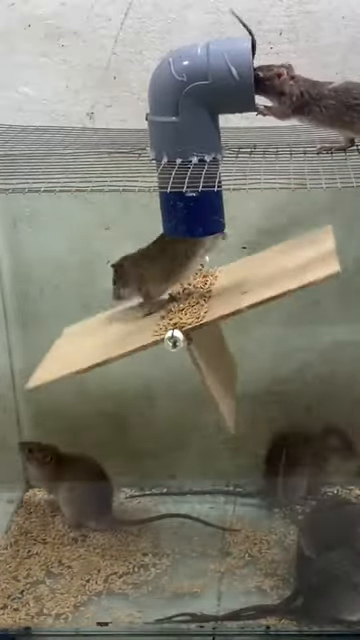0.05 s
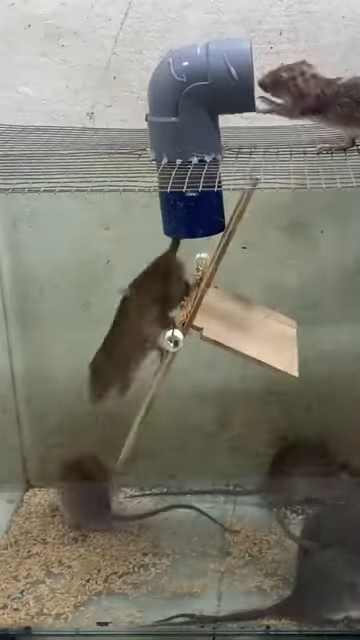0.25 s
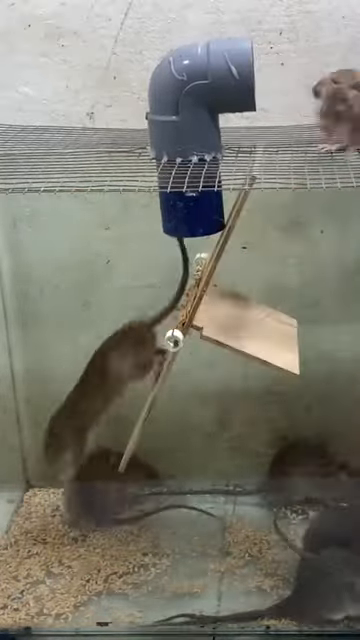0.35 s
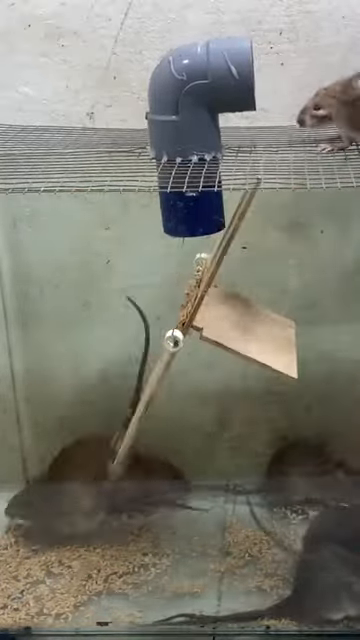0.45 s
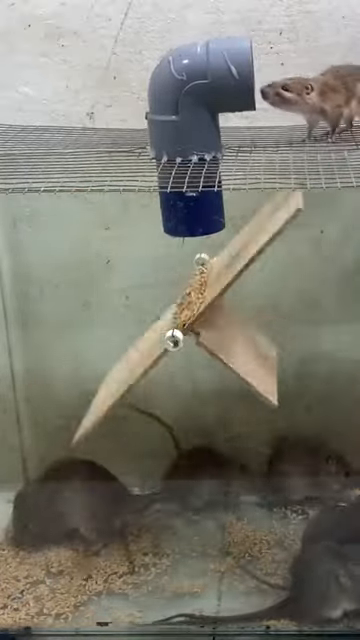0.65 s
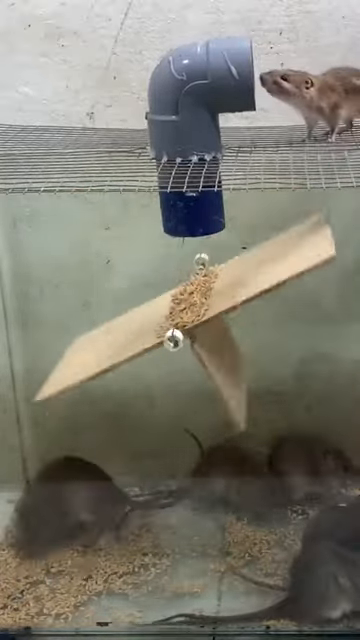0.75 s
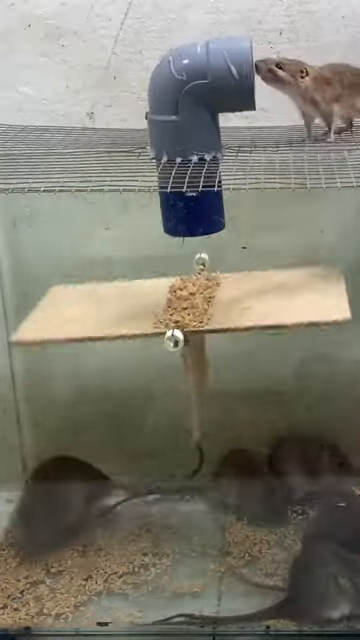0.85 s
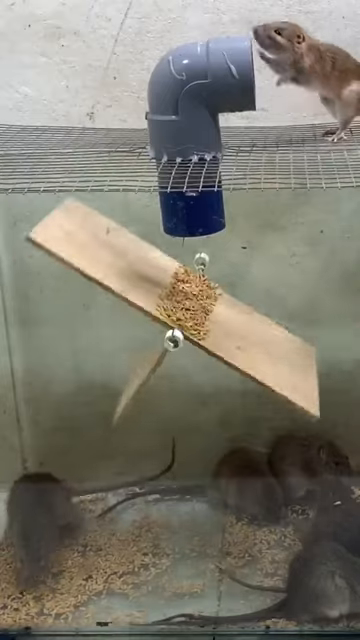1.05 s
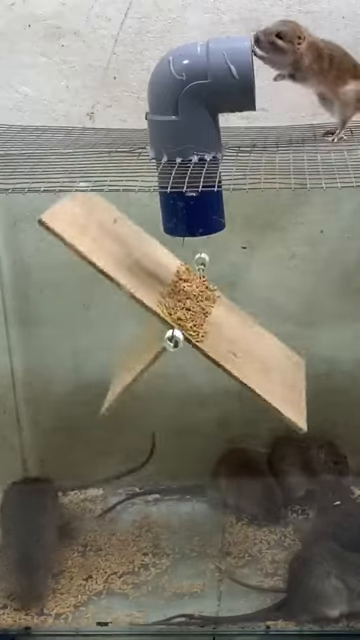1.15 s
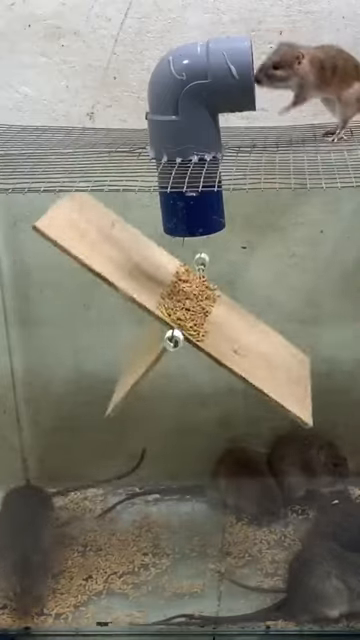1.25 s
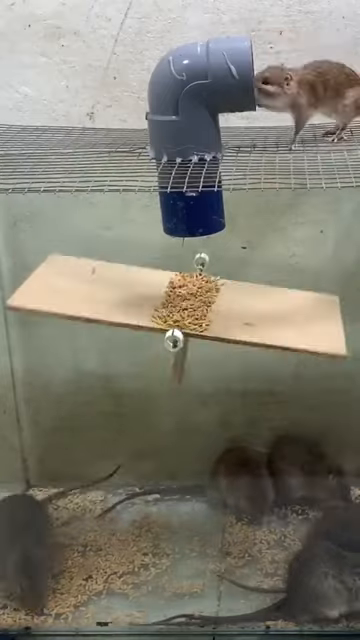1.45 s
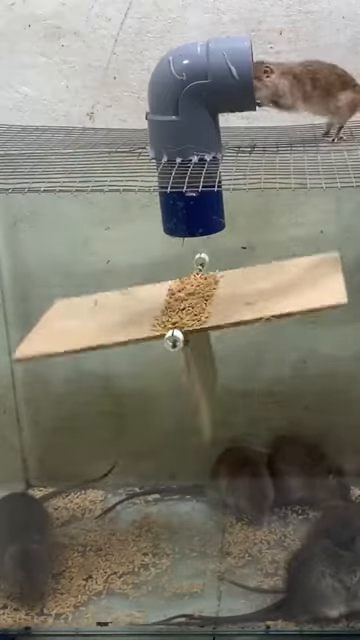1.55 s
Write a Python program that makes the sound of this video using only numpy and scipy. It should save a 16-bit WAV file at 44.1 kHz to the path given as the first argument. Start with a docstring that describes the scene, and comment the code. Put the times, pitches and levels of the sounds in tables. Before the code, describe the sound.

A wooden plank clacks and a rat drops into a glass tank with a hollow boom.

```python
"""Over quiet room hum, a rat drops off a tipping wooden plank into a glass tank, heard close.
The plank clacks against its stop, and the blows set the panes and the air in the tank booming.
Loose feed grain sprays, then rustles under scrambling feet. The plank swings back with a soft bump.
As the boom fades, claws scratch in short strokes, and a few claws and grains tick on the glass."""
import sys
import numpy as np
from scipy import signal
from scipy.fft import rfft, irfft
from scipy.io import wavfile

SR = 44100
rng = np.random.default_rng(int(sys.argv[2]) if len(sys.argv) > 2 else 0)


def int16_out(signal):
    """Quantize to a 16-bit WAV file."""
    q = np.round(np.clip(np.atleast_2d(signal).T, -1, 1) * 32767)
    wavfile.write(sys.argv[1], SR, q.astype(np.int16))


N = 70560
TIME_S = np.arange(N) / SR
OPPOSITE_LR = np.array([[1], [-1]])


def amp(db):
    return 10 ** (np.asarray(db) / 20)


def unit_rms(x):
    return x / np.sqrt(np.mean(x ** 2) + 1e-20)


def unit_energy(x):
    return x / np.sqrt(np.mean(np.sum(x ** 2, -1)) + 1e-20)


def at_hz(curve, hz):
    knots_hz, values = np.transpose(curve)
    return np.interp(np.log(hz + 1), np.log(knots_hz + 1), values)


def add(mix, start_s, sound):
    part = mix[..., max(round(start_s * SR), 0):][..., :sound.shape[-1]]
    part += sound[..., :part.shape[-1]]


def convolve(x, response):
    return signal.fftconvolve(np.atleast_2d(x), np.atleast_2d(response), axes=1)[:, :N]


def min_phase(db_at_hz, size=4096):
    """Causal impulse response with the given spectral shape."""
    hz = abs(np.fft.fftfreq(size, 1 / SR))
    log_gain = np.log(amp(np.maximum(db_at_hz(hz), -100)))
    spectrum = np.exp(np.conj(signal.hilbert(log_gain)))
    return unit_energy(np.fft.ifft(spectrum).real)


# Left-right likeness: f/Hz, correlation
CORRELATION = [(50, 0.86), (170, 0.93), (300, 0.63), (600, 0.29), (2000, 0.15), (14000, 0.017)]


def stereo_angle_rad(hz):
    return np.arccos(np.clip(at_hz(CORRELATION, hz), -1, 1)) / 2


def correlate_lr(x):
    """Makes two independent channels alike in the bass."""
    spectra = rfft(x)
    angle = stereo_angle_rad(np.fft.rfftfreq(x.shape[1], 1 / SR))
    mid, side = spectra[0] * np.cos(angle), spectra[1] * np.sin(angle)
    return irfft(np.array([mid + side, mid - side]), x.shape[1])


# Room noise spectrum: f/Hz, relative level/dB
ROOM_SPECTRUM = [(15, -42), (36, -9.5), (48, 6), (62, -1), (95, 0), (160, -3), (240, -12.5), (320, -8),
                 (700, -22), (1200, -26), (2300, -28), (4500, -36), (10000, -46), (15000, -47)]


def room(noise_db=-49.5, hum_hz=48.7, hum_db=-48):
    """Quiet room noise with a low hum."""
    white = correlate_lr(rng.standard_normal((2, N)))
    gain = amp(at_hz(ROOM_SPECTRUM, np.fft.rfftfreq(N, 1 / SR)))
    noise = unit_rms(irfft(rfft(white) * gain, N))
    return amp(noise_db) * noise + amp(hum_db) * np.sin(2 * np.pi * hum_hz * TIME_S)


# Tank reverberation: f/Hz, T60/s
TANK_DECAY = [(150, 0.78), (600, 0.5), (2000, 0.41), (6000, 0.11), (14000, 0.21)]


def tank_reverb(x, early_tau_s=0.009, early_db=-1, rise_s=0.0045):
    """Dense early bounces between the panes, and a tail that dies sooner in the treble."""
    hz, frame_s, spectra = signal.stft(rng.standard_normal((2, SR)), SR, nperseg=256)
    decay = amp(-60 * frame_s / at_hz(TANK_DECAY, hz)[:, None])
    tail = signal.istft(spectra * decay, SR, nperseg=256)[1][:, :SR]
    t = TIME_S[:SR]
    early = rng.standard_normal((2, SR)) * np.exp(-t / early_tau_s)
    response = (unit_energy(tail) + amp(early_db) * unit_energy(early)) * np.minimum(t / rise_s, 1)
    return convolve(x, unit_energy(correlate_lr(response)))


def crackle(spectrum, rate_per_s, spread_db):
    """Tiny impacts of uneven size at random moments."""
    clicks = (rng.random(N) < rate_per_s / SR) * rng.choice([-1, 1], N)
    sizes = amp(spread_db * np.minimum(rng.exponential(1, N), 4))
    response = min_phase(lambda hz: at_hz(spectrum, hz))
    return unit_rms(convolve(clicks * sizes, response)[0])


def contact(centre_hz, width_oct, tau_s):
    """Brief rough contact: a band of noise with the energy of 20 ms at 0 dB."""
    def band_db(hz):
        offset = np.log2((hz + 1) / centre_hz) / width_oct
        return -14 * np.log10(1 + offset ** 2) - 20 * np.log10(1 + (hz / (5 * centre_hz)) ** 2)

    t = TIME_S[:SR // 8]
    spectra = rfft(rng.standard_normal((2, len(t))) * np.exp(-t / tau_s))
    whitened = irfft(spectra / abs(spectra), len(t))
    burst = correlate_lr(whitened * np.exp(-t / (2 * tau_s)))
    return unit_energy(convolve(burst, min_phase(band_db))) * np.sqrt(0.02 * SR)


# Claw strokes: t/s, length/s, relative level/dB
CLAW_STROKES = [(.70, 0.021, -44.5), (0.738, 0.026, -50), (0.847, .02, -48.5), (1.253, 0.082, -54.5),
                (1.369, 0.11, -57), (1.489, 0.021, -49), (1.542, 0.024, -51)]
# Claw slip spectrum: f/Hz, relative level/dB
SLIP_SPECTRUM = [(1000, -16.5), (2100, -2.5), (2500, -4.5), (3300, -9.5), (4500, -18), (7500, -21),
                 (15000, -24)]


def claw_scratches(dry_db=-11.5, wet_db=-3):
    """Each stroke of a claw on wood or glass is a short swell of slips."""
    pressure = np.zeros(N)
    for start_s, length_s, db in CLAW_STROKES:
        progress = np.arange(0, 1, 1 / (length_s * SR))
        add(pressure, start_s, amp(db) * np.sqrt(np.sin(np.pi * progress)))
    slips = pressure * crackle(SLIP_SPECTRUM, rate_per_s=700, spread_db=3)
    return amp(dry_db) * slips + amp(wet_db) * tank_reverb(slips)


# Ticks on glass: t/s, relative level/dB, f/Hz, width/oct, extra direct gain/dB
GLASS_TICKS = [(0.2052, -41, 2880, 0.22, -14), (0.504, -36, 7300, 0.13, -5), (.512, -49, 7040, 0.097, -15),
               (0.7698, -42, 2310, .6, -12), (0.8846, -43.5, 2310, 0.82, -7), (0.897, -49, 5360, 0.35, -2),
               (.953, -48, 4630, 2.12, -1.5), (1.1044, -65, 2500, 0.3, 7), (1.1726, -45, 3610, 0.72, -1),
               (1.5041, -53, 2600, 0.33, 3.5), (1.566, -49, 3960, 1.8, -3)]


def glass_ticks(dry_db=-11.5, wet_db=-6):
    """Claws and single grains strike the glass: a centred snap, then reverberation."""
    hits, snaps = np.zeros((2, 2, N))
    for start_s, db, hz, width_oct, direct_db in GLASS_TICKS:
        tick = amp(db) * contact(hz, width_oct, tau_s=0.00065)
        add(hits, start_s, tick)
        add(snaps, start_s, amp(direct_db) * tick[0])
    return amp(dry_db) * snaps + amp(wet_db) * tank_reverb(hits)


# Grain scatter envelope: t/s, relative level/dB
GRAIN_ENVELOPE = [(0.0, -67.5), (0.178, -67.5), (0.262, -39), (0.328, -46.5), (0.454, -49.5), (0.502, -46),
                  (0.614, -54), (0.876, -60.5), (0.894, -59.5), (0.94, -64.5), (0.958, -53), (1.028, -65.5),
                  (1.166, -69.5), (1.172, -61.5), (1.27, -68.5), (1.304, -60.5), (1.46, -68.5), (1.6, -60)]
# Grain impact spectrum: f/Hz, relative level/dB
GRAIN_SPECTRUM = [(700, -16), (1400, -3.5), (2500, 0), (5000, -3.5), (7500, -7), (10500, -8.5),
                  (14000, -18.5), (15200, -30)]


def feed_grain(dry_db=-1.5, wet_db=2):
    """Feed sprays and is kicked about on both sides."""
    impacts = np.array([crackle(GRAIN_SPECTRUM, rate_per_s=1800, spread_db=2.5) for side in "LR"])
    rustle = impacts * amp(np.interp(TIME_S, *np.transpose(GRAIN_ENVELOPE)))
    return amp(dry_db) * rustle + amp(wet_db) * tank_reverb(rustle)


# Plank on its stop: t/s, level/dB, f/Hz, rise/s
PLANK_TOCKS = [(.235, -26, 1350, .003), (.502, -26, 885, .008)]


def plank_tocks(wet_db=-8):
    """At each hit one hollow mode of the plank swells and dies."""
    tocks, t = np.zeros((2, N)), TIME_S[:SR // 4]
    for start_s, db, hz, rise_s in PLANK_TOCKS:
        envelope = t / rise_s * np.exp(1 - t / rise_s)
        add(tocks, start_s, amp(db) * envelope * np.sin(2 * np.pi * hz * t))
    return tocks + amp(wet_db) * tank_reverb(tocks)


# Plank and landing impacts: t/s, relative level/dB, f/Hz, width/oct, decay/s
IMPACTS = [(.152, -39, 328, 1.7, 0.015), (0.2035, -28, 1200, 0.45, 0.022), (.236, -25, 1250, 0.68, 0.0028),
           (.2455, -18.5, 634, 0.45, 0.0046), (.268, -21, 463, 0.67, 0.0044),
           (.284, -40.5, 1480, 1.2, 0.023), (.303, -32, 627, 0.15, 0.018), (.378, -26.5, 576, 0.78, 0.027),
           (.464, -31.5, 1860, 0.7, 0.012), (.504, -27.5, 924, 0.16, 0.0066),
           (.507, -24.5, 534, 0.68, 0.013), (.528, -28, 1050, 1.4, 0.015), (.552, -28, 560, 0.39, 0.0034),
           (.664, -34.5, 1500, 0.55, 0.004), (.775, -38.5, 434, 2.4, 0.022),
           (.855, -56, 1016, 0.63, 0.0037), (1.315, -42.5, 440, 1.2, 0.014), (1.415, -47, 936, 0.27, 0.023),
           (1.564, -44.5, 1020, 0.65, 0.016)]
# Upper tank modes: f/Hz, relative level/dB, T60/s
UPPER_MODES = [(428, -2, 0.86), (478.7, -11.5, 0.35), (579, 0, 0.62), (631.5, 0.5, 0.44), (688.7, 1, 0.51),
               (717, 0.5, 0.12), (853, -36, 0.16), (1040, -2, 0.57), (1123, 3.5, 0.2), (1280, -28, 0.15),
               (1410, -1, 0.52), (2145, -1, 0.59), (2408, 4.5, 0.72)]


def clacks(dry_db=-15.5, wet_db=-14, ring_db=-23.5):
    """The plank and the landing rat clack, ringing the tank's upper modes."""
    hits, ring, t = np.zeros((2, N)), np.zeros((2, SR)), TIME_S[:SR]
    for start_s, db, hz, width_oct, tau_s in IMPACTS:
        add(hits, start_s, amp(db) * contact(hz, width_oct, tau_s))
    for k, (hz, db, t60_s) in enumerate(UPPER_MODES):
        phase_rad = (-1) ** k * OPPOSITE_LR * np.pi / 4  # channels in quadrature
        ring += amp(db - 60 * t / t60_s) * np.sin(2 * np.pi * hz * t + phase_rad)
    ringing = convolve(hits[0], unit_energy(ring))
    return amp(dry_db) * hits + amp(wet_db) * tank_reverb(hits) + amp(ring_db) * ringing


# Blows to the tank: t/s, relative level/dB, corner f/Hz (higher is harder)
BLOWS = [(0.1395, -34, 102), (0.2442, -12, 155), (0.2788, -11.5, 108), (0.3752, -30, 368),
         (0.4406, -21, 108), (0.4783, -30, 371), (0.5201, -29.5, 570), (0.6443, -28.0, 112),
         (1.022, -30.5, 108)]
# Low modes of panes and enclosed air: f/Hz, relative level/dB, T60/s, signed gain
LOW_MODES = [(99, -13, 0.42, 0.77), (118.5, -19, 0.92, -0.93), (147.3, 3, 0.52, 0.8),
             (158.5, -11, 2.5, 0.68), (169.6, 9, 0.17, -0.73), (184.5, -10.5, 1.27, -0.68),
             (214.3, -9, 1.13, 0.81), (268, -14.5, 0.75, 0.97), (296.3, -5.5, 0.55, 0.9),
             (386.2, -16, 2.3, -0.53)]


def tank_boom(rise_s=0.00078, stereo_width=0.69, tilt_db=0.5):
    """Blows drive the low modes; neighbours of opposite sign make the boom swell and beat."""
    boom = np.zeros((2, N))
    for hz, mode_db, t60_s, signed_gain in LOW_MODES:
        phase_rad = stereo_width * stereo_angle_rad(hz) * OPPOSITE_LR
        envelope = amp(mode_db - 60 * TIME_S / t60_s) * np.minimum(TIME_S / rise_s, 1)
        mode = signed_gain * envelope * np.sin(2 * np.pi * hz * TIME_S + phase_rad)
        for start_s, blow_db, corner_hz in BLOWS:
            add(boom, start_s, amp(blow_db) * mode / np.sqrt(1 + (hz / corner_hz) ** 4))
    return boom * amp(tilt_db * OPPOSITE_LR)


def scene():
    landing = tank_boom() + clacks() + plank_tocks()
    return landing + glass_ticks() + feed_grain() + claw_scratches() + room()


def record(dry):
    """Steep low-pass at 15.6 kHz."""
    lowpass = signal.firwin(255, 15600, window=("kaiser", 9), fs=SR)
    return signal.oaconvolve(dry, lowpass[None], "same")


dry = scene()
out = record(dry)
int16_out(out)
```